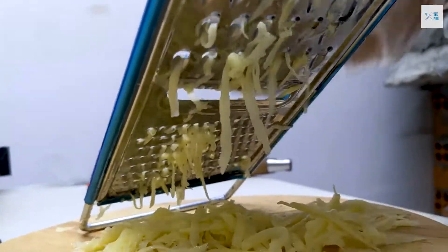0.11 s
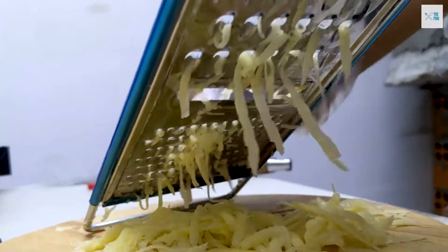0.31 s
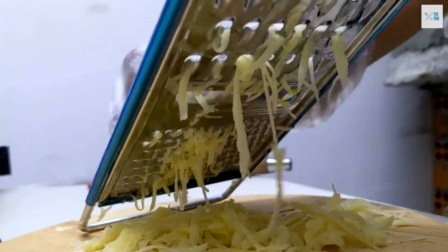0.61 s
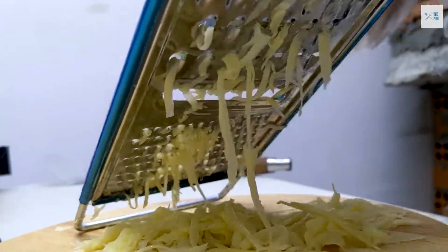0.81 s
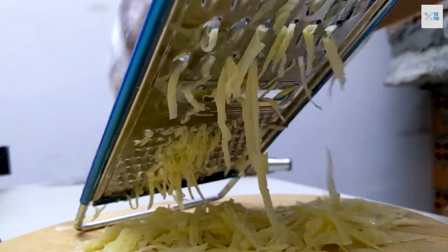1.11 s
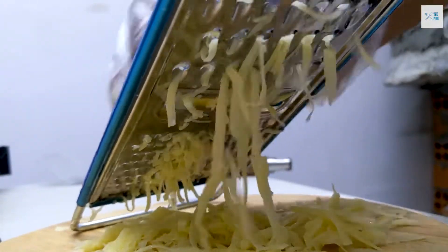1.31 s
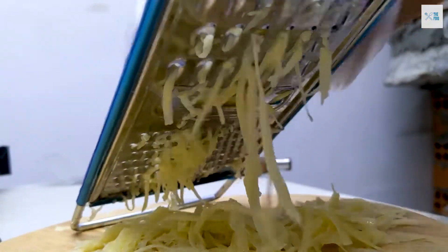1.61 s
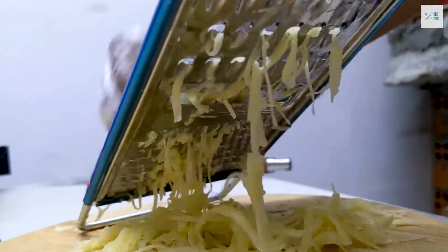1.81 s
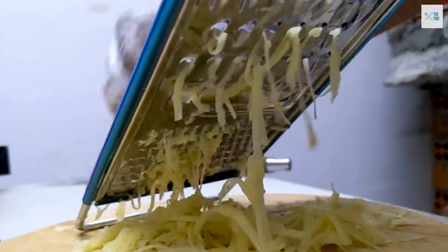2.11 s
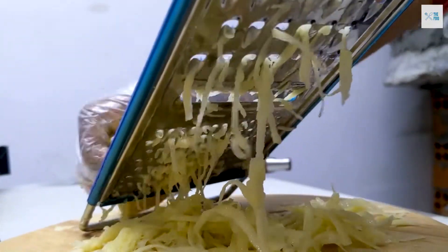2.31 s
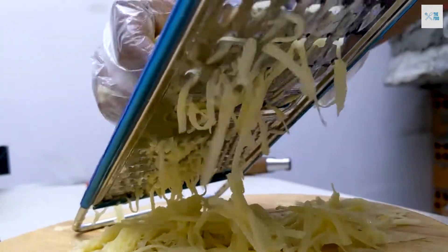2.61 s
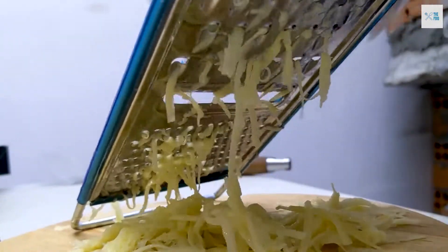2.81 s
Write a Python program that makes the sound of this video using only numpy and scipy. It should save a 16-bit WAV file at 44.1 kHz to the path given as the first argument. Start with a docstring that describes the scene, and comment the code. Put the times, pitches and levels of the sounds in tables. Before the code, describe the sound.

Close, rhythmic wet crunching of a potato being grated, the grater bumping a wooden board.

```python
"""A light scrape and a faint rattle, then eight wet crunches: raw potato pushed down a steel grater,
about three strokes a second, close to a stereo microphone in a small kitchen. Each stroke is a mass of
bursting cells, coloured by the steel sheet; between strokes the potato slides lightly back.
The grater's foot judders and thumps on a wooden board to the left, and the room answers briefly."""
import sys
import numpy as np
from scipy import signal
from scipy.fft import rfft, irfft, next_fast_len
from scipy.io import wavfile
from scipy.ndimage import uniform_filter1d, minimum_filter1d, map_coordinates

SR = 44100
rng = np.random.default_rng(int(sys.argv[2]) if len(sys.argv) > 2 else 0)


def inscribe(sig):
    """Save sig as 16-bit PCM at rate SR to the path in sys.argv[1].

    A 1-D sig is mono; a 2-D sig holds one channel per row.
    Samples are clipped to [-1, 1] before scaling.
    """
    pcm = np.round(np.clip(np.atleast_2d(sig).T, -1, 1) * 32767)
    wavfile.write(sys.argv[1], SR, pcm.astype(np.int16))


N = 130095

# Modes of the steel sheet. Each row: pitch in Hz, level in dB, t60 in seconds.
STEEL_MODES = [(511, -4, .14), (811, -6, .11), (1680, -9, .11), (2851, 0, .35), (3102, -3, .17),
               (3297, -5, .17), (5335, -4, .2), (6430, -4, .06), (7630, 2, .05), (8145, 2, .08),
               (9635, -2, .07), (13265, -2, .07)]
# Noise colours. Each row: frequency in Hz, relative level in dB.
COARSE_SPECTRUM = [(710, -53), (1200, -10), (1440, -14.5), (2560, -6.5), (3590, -8.5), (4310, -5.5),
                   (5900, -5), (7410, 0), (12100, -3.5), (13300, -2), (15300, -5), (16000, -10)]  # bright crunch on the coarse teeth
RASP_SPECTRUM = [(40, -52), (150, -20), (300, 4), (520, 5), (640, 2), (810, 5.5), (1100, 1.5), (1500, -9),
                 (3000, -6)]  # lower rasp of tearing flesh
JUDDER_SPECTRUM = [(25, -43), (45, -40), (62, -1.5), (88, -32), (125, 2.5), (195, 3.5), (250, -4.5),
                   (320, -8.5), (600, -13), (1500, -35)]  # the whole grater shaking
CLACK_SPECTRUM = [(300, -37), (1750, 2.5), (3200, -4), (5500, -13), (9000, -41)]  # dry contact of the frame


def amp(db):
    """Decibels to gain."""
    return 10 ** (np.asarray(db) / 20)


def unit(x):
    """Scale to rms 1."""
    return x / np.sqrt(np.mean(x ** 2) + 1e-20)


def along(points, hz):
    """Interpolate (Hz, value) points on a log frequency axis."""
    freqs, values = np.transpose(points)
    return np.interp(np.log(hz + 1), np.log(freqs + 1), values)


def since(start):
    """Seconds since start for each sample, zero before."""
    return np.maximum(np.arange(N) / SR - start, 0)


def wobble(rate):
    """A smooth random curve, rate knots a second."""
    knots = rng.standard_normal(int(N * rate / SR) + 4)
    return map_coordinates(knots, [np.arange(N) * rate / SR])


def filtered(x, response):
    """Filter x by response(Hz)."""
    size = next_fast_len(N + SR // 2)
    hz = np.fft.rfftfreq(size, 1 / SR)
    return irfft(rfft(x, size) * response(hz), size)[..., :N]


def noise(spectrum, grain=1):
    """Stereo noise of rms 1, chopped by a grain envelope, then coloured; widest in the treble."""
    # Stereo image. Each row: frequency in Hz, left-right likeness from 0 to 1.
    likeness = [(100, 0.8), (500, 0.94), (1200, 0.5), (3000, 0.12), (12000, 0.018)]

    def colour(hz):
        width = np.arccos(np.clip(along(likeness, hz), -1, 1)) / 2
        return amp(along(spectrum, hz)) * [np.cos(width), np.sin(width)]

    mid, side = filtered(grain * rng.standard_normal((2, N)), colour)
    return unit(np.array([mid + side, mid - side]))


def bursts(rate, spread_db, life_s, bed):
    """Envelope of cells bursting at random, each its own size, over a bed of smooth friction."""
    onsets = rng.random(N) < rate / SR
    sizes = amp(spread_db * np.minimum(rng.standard_normal(N), 2.5))
    decay = np.exp(-np.arange(SR // 50) / SR / life_s)
    power = np.abs(signal.fftconvolve(onsets * sizes ** 2, decay)[:N])
    return np.sqrt(power / power.mean() + bed)


def push(start, rise, end, release_db_per_s):
    """Envelope of a hand movement: builds up smoothly, holds, dies away."""
    build = np.sin(np.pi / 2 * np.minimum(since(start) / rise, 1)) ** 1.51
    return build * amp(-release_db_per_s * since(end))


def struck(start, t60, contact_s=.0006):
    """Envelope of a contact: a sharp rise, then a steady decay."""
    t = since(start)
    return (1 - np.exp(-t / contact_s)) * amp(-60 * t / t60)


def ring(modes):
    """Half a second of ringing, each mode at a slightly random strength."""
    t = np.arange(SR // 2) / SR
    return sum(amp(db + rng.normal(0, 1.5) - 60 * t / t60) * np.sin(2 * np.pi * hz * t)
               for hz, db, t60 in modes)


def room_tone():
    """The faint, low hush of the kitchen."""
    # Each row: frequency in Hz, relative level in dB.
    hush = [(15, -52), (25, -45), (190, 1.5), (326, -6.5), (503, -14), (1260, -20.5), (2840, -22),
            (3430, -26.5), (14800, -41), (16000, -43)]
    return amp(-47) * noise(hush)


def kitchen(x):
    """The small room returns a short diffuse tail, different in each channel."""
    # Room decay. Each row: frequency in Hz, t60 in seconds.
    decay_times = [(100, 0.35), (500, 0.29), (3000, 0.45), (14000, 0.032)]
    hz, t, bands = signal.stft(rng.standard_normal((2, SR // 2)), SR, nperseg=256)
    decay = amp(-60 * t / along(decay_times, hz)[:, None])
    tail = signal.istft(bands * decay, SR, nperseg=256)[1]
    return signal.fftconvolve(x, tail / np.linalg.norm(tail[0]), axes=1)[:, :N]


def near_reflections(x, count=12, spread_s=.014):
    """Close reflections off board and grater give the scraping its hollow comb colour."""
    taps = np.zeros((2, SR // 10))
    for channel in taps:
        delays = (.001 + rng.random(count) * spread_s) * SR
        channel[delays.astype(int)] = rng.standard_normal(count)
    taps /= np.linalg.norm(taps, axis=1, keepdims=True)
    return signal.fftconvolve(x, taps, axes=1)[:, :N]


def sheet(x, pressed_t60=.1):
    """The steel sheet rings along with the scraping, damped by the potato pressed against it."""
    ringing = ring([(hz, db, min(t60, pressed_t60)) for hz, db, t60 in STEEL_MODES])
    return signal.fftconvolve(x, ringing[None] / np.linalg.norm(ringing), axes=1)[:, :N]


def rattling(buzz_rad=.9, clatter_db=-4.5):
    """The loose frame chatters: each contact is a short, buzzy clink with a little dry clatter."""
    # Each row: start in seconds, level in dB, pitch in Hz.
    rattles = [(0.02, -31, 1736), (1.096, -33.5, 1760), (2.171, -34.5, 1730), (2.224, -39.5, 1730),
               (2.242, -46, 1650), (2.282, -41, 1730), (2.815, -43, 2730), (2.865, -46, 2480),
               (2.912, -48, 2620)]
    clinks, clatter = np.zeros((2, N))
    for start, db, hz in rattles:
        hit = amp(db) * struck(start, t60=.082)
        clinks += hit * np.sin(2 * np.pi * hz * since(start) + buzz_rad * wobble(450))
        clatter += hit
    return clinks + amp(clatter_db) * clatter * noise(CLACK_SPECTRUM)


def jolting(soft_hz=5200, clack_db=4):
    """The unloaded grater drops back with a dry clack and its low modes ring freely."""
    # Each row: start in seconds, level in dB.
    jolts = [(0.403, -32.5), (0.441, -33.5), (2.128, -35.5), (2.226, -45)]
    low_modes = [(hz, db - 12 * (hz / soft_hz) ** 2, t60) for hz, db, t60 in STEEL_MODES]
    rings, clacks = np.zeros(N + SR), np.zeros(N)
    for start, db in jolts:
        rings[round(start * SR):][:SR // 2] += amp(db) * ring(low_modes)
        clacks += amp(db + clack_db) * struck(start, t60=.06)
    return rings[:N] + clacks * noise(CLACK_SPECTRUM)


def squeaking(peak_s=.00097, relative_width=.065):
    """Tiny narrow chirps where the wet face sticks and slips on the steel."""
    # Each row: start in seconds, level in dB, pitch in Hz.
    squeaks = [(1.936, -43, 4500), (1.966, -31, 4450), (2.245, -39, 4300)]
    out = np.zeros((2, N))
    for start, db, hz in squeaks:
        age = since(start) / peak_s
        hiss = rng.standard_normal((2, N))
        band = filtered(hiss, lambda f: 1 / (1 + ((f / hz - 1) / relative_width) ** 2))
        out += amp(db) * (age * np.exp(1 - age)) ** 2 * unit(band)
    return out


def knocking():
    """Hollow knocks: the potato bumps the sheet and damps it at once."""
    # Each row: start in seconds, level in dB, pitch in Hz.
    knocks = [(1.468, -22, 532), (1.620, -28, 512), (2.074, -25, 774), (2.536, -30.5, 747),
              (2.55, -24.5, 514)]
    return sum(amp(db) * struck(start, t60=.092) * np.sin(2 * np.pi * hz * since(start))
               for start, db, hz in knocks)


def thumping(peak_s=.0074, compactness=1.98):
    """Soft, heavily damped blows of the grater's foot set the board booming."""
    # Each row: start in seconds, level in dB, pitch in Hz.
    thumps = [(.002, -34, 160), (.004, -28, 69.5), (0.153, -36, 112), (0.234, -18, 135), (.249, -19, 139),
              (0.345, -12.5, 142), (0.367, -15.5, 188), (0.381, -2.5, 157), (0.526, -24.5, 128),
              (0.681, -20, 142.7), (0.711, -23.5, 165.5), (1.03, -16.5, 159), (1.072, -20, 139),
              (1.29, -29, 158), (1.432, -25.5, 139), (1.488, -18.5, 135), (1.624, -21.5, 134),
              (1.639, -26, 125), (1.683, -24.5, 131), (1.8, -14.5, 144), (2.094, -12.5, 180),
              (2.11, -16.5, 153), (2.125, -5.5, 160.6), (2.263, -22.5, 139), (2.402, -14.5, 139),
              (2.899, -34, 194)]
    # Modes of the board and the table under it. Each row: pitch in Hz, level in dB, t60 in seconds.
    board_modes = [(62.3, -17, 0.23), (140.6, -26, 0.45), (182, -12, 0.19), (308, -15, 0.14),
                   (492.6, -35, 0.3)]
    out = np.zeros(N + SR)
    t = np.arange(SR // 2) / SR
    age = t / peak_s
    for start, db, hz in thumps:
        blow = (age * np.exp(1 - age)) ** compactness * np.sin(2 * np.pi * hz * t)
        boom = ring(board_modes) * (1 - np.exp(-age))
        out[round(start * SR):][:len(t)] += amp(db) * (blow + boom)
    return out[:N]


def ticking():
    """Single fibres snap on a tooth: a few milliseconds of bright crack."""
    # Each row: start in seconds, level in dB.
    ticks = [(.068, -40), (0.199, -41), (0.525, -32), (.549, -39), (.859, -17), (0.862, -19), (.886, -21),
             (1.609, -16), (1.967, -28)]
    # Colour of a snap. Each row: frequency in Hz, relative level in dB.
    snap_spectrum = [(1500, -29), (5000, 3), (14000, 0)]
    snaps = sum(amp(db) * struck(start, t60=.014) for start, db in ticks)
    return snaps * noise(snap_spectrum)


def catching():
    """Short nicks where the potato snags on a tooth."""
    # Each row: start in seconds, level in dB, t60 in seconds, rasp in dB relative to the nick.
    catches = [(1.2, -31.5, 0.081, -31), (1.61, -22.5, 0.046, -6.5), (2.535, -22, 0.033, 0)]
    nick, rasp = np.zeros((2, N))
    for start, db, t60, rasp_db in catches:
        snag = amp(db) * struck(start, t60)
        nick += snag
        rasp += amp(rasp_db) * snag
    return nick * noise(COARSE_SPECTRUM) + rasp * noise(RASP_SPECTRUM)


def sliding():
    """The wet face skims back over the teeth with a light crackle and shakes the grater."""
    # Each row: start and end in seconds, level in dB, judder in dB relative to the skim.
    slides = [(-.02, -0.001, -30.5, 1.5), (0.032, 0.133, -48.5, -13), (0.38, 0.452, -49, 17),
              (0.5, 0.556, -40, 6), (0.696, 0.759, -33.5, 3.5), (0.818, 0.863, -34, -17),
              (0.867, 0.916, -36, 3.5), (1.07, 1.15, -39, -2.5), (1.176, 1.245, -44, -14),
              (1.259, 1.305, -41, -5), (1.505, 1.624, -48, 4), (1.637, 1.701, -43.5, 7),
              (1.854, 1.916, -47, -1), (1.95, 1.995, -41.5, 6.5), (2.144, 2.184, -43.5, 12),
              (2.241, 2.272, -39, 5.5), (2.452, 2.507, -45.5, 6), (2.513, 2.589, -34.5, 0.5),
              (2.78, 2.878, -45, -12), (2.886, 2.964, -37.5, -2.5)]
    # Colour of the skim. Each row: frequency in Hz, relative level in dB.
    skim_spectrum = [(240, -25), (400, -47), (512, 1), (579, -11.5), (789, -11.5), (1600, -14.5),
                     (11400, -15), (12700, -17), (16000, -14.5)]
    skim, judder = np.zeros((2, N))
    for start, end, db, judder_db in slides:
        move = amp(db) * push(start, rise=.017, end=end, release_db_per_s=322)
        skim += move
        judder += amp(judder_db) * move
    grain = bursts(rate=240, spread_db=3.2, life_s=.0012, bed=1.0)
    return skim * noise(skim_spectrum, grain), judder * noise(JUDDER_SPECTRUM)


def shredding(x, depth_db=1.9):
    """Shreds tear off one by one, each favouring its own part of the spectrum for a moment."""
    bands = signal.stft(x, nperseg=256)[2]
    patches = rng.standard_normal(bands.shape[1:])
    for axis, size in ((0, 9), (0, 5), (1, 3), (1, 2)):  # smooth over frequency, then time
        patches = uniform_filter1d(patches, size, axis)
    gain = amp(depth_db * unit(patches))
    return signal.istft(bands * unit(gain), nperseg=256)[1][:, :N]


def cutting(linger_s=.012, rasp_trim_db=-8, judder_trim_db=-7.5):
    """Teeth tear the flesh: a coarse and a fine crunch, a lower rasp, and the whole grater's judder."""
    # Each row: start, bite-in time and let-go in seconds, release in dB a second, level in dB,
    # share of power on the fine teeth from 0 to 1, relative rasp and judder in dB before their trims.
    strokes = [(0.219, 0.02, 0.37, 765, -20, 0.83, -5.5, 0), (0.602, 0.076, 0.7, 435, -21.5, 0.05, 3, -0.5),
               (0.952, 0.051, 1.055, 345, -22, 0.04, 2.5, 2),
               (1.331, 0.024, 1.482, 350, -24, 0.07, -0.5, -3), (1.69, 0.061, 1.787, 428, -18, 0.01, 2, -8),
               (2.019, 0.034, 2.0974, 374, -22, 0.12, 4.5, -8),
               (2.319, 0.053, 2.3934, 338, -21, 0.16, 1.5, -4.5),
               (2.624, 0.059, 2.6835, 469, -21.5, 0.1, -2.5, -2.5)]
    # Crunch on the fine teeth. Each row: frequency in Hz, relative level in dB.
    fine_spectrum = [(590, -13), (1000, -7), (1980, -3), (2150, -1), (2900, 2.5), (4790, -3.5), (5440, 1.5),
                     (8960, -11), (12400, -10), (16000, -3)]
    coarse, fine, rasp, judder = np.zeros((4, N))
    for start, rise, end, release, db, fine_share, rasp_db, judder_db in strokes:
        cut = amp(db) * push(start, rise, end, release)
        load = amp(db) * push(start, rise + linger_s, end + linger_s, release)  # the low layers lag
        coarse += np.sqrt(1 - fine_share) * cut
        fine += np.sqrt(fine_share) * cut
        rasp += amp(rasp_db + rasp_trim_db) * load
        judder += amp(judder_db + judder_trim_db) * load
    grain = bursts(rate=1500, spread_db=3.0, life_s=.0005, bed=.8) * amp(.7 * wobble(70))
    crunch = coarse * noise(COARSE_SPECTRUM, grain) + fine * noise(fine_spectrum, grain)
    crunch += rasp * noise(RASP_SPECTRUM, grain)
    return crunch, judder * noise(JUDDER_SPECTRUM)


def scene(left_lead_s=.00009):
    """Grater and board close to the microphone and a little to its left, the kitchen behind."""
    # Stereo balance. Each row: frequency in Hz, left over right in dB.
    balance = [(40, -8), (90, 9.5), (190, 5), (330, 1), (700, 2), (1400, 0.5), (2800, 2), (5500, 3),
               (9000, -1.7), (14000, 1)]
    crunch, cut_judder = cutting()
    skim, slide_judder = sliding()
    scrape = shredding(crunch + skim + catching()) + ticking()
    steel = scrape + amp(-5.5) * near_reflections(scrape) + amp(-19) * sheet(scrape)
    contacts = rattling() + jolting() + squeaking() + knocking()
    near = steel + contacts + cut_judder + slide_judder + thumping()
    mix = near + amp(-22.5) * kitchen(near) + room_tone()
    sides = np.array([[.5], [-.5]])

    def placement(hz):
        return amp(sides * along(balance, hz)) * np.exp(2j * np.pi * sides * hz * left_lead_s)

    return filtered(mix, placement)


def record(dry, ceiling=.97, top_hz=15950):
    """A limiter holds down the biggest thumps; nothing is kept above the band limit."""
    needed = 1 / np.maximum(np.abs(dry).max(axis=0) / ceiling, 1)
    gain = uniform_filter1d(minimum_filter1d(needed, size=400), size=400)
    return filtered(dry * gain, lambda hz: hz < top_hz)


dry = scene()
out = record(dry)
inscribe(out)
```